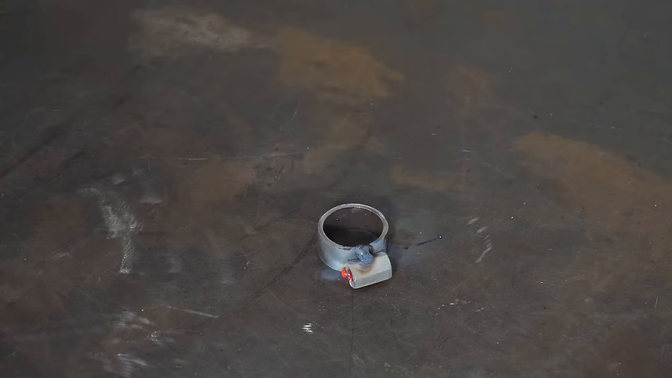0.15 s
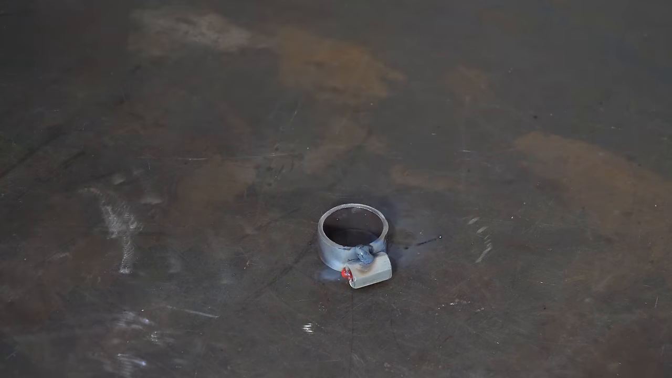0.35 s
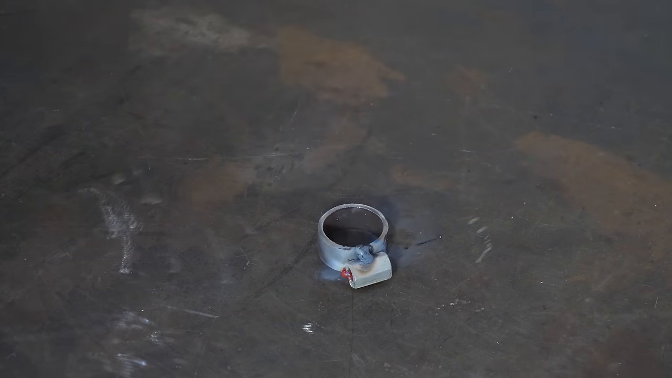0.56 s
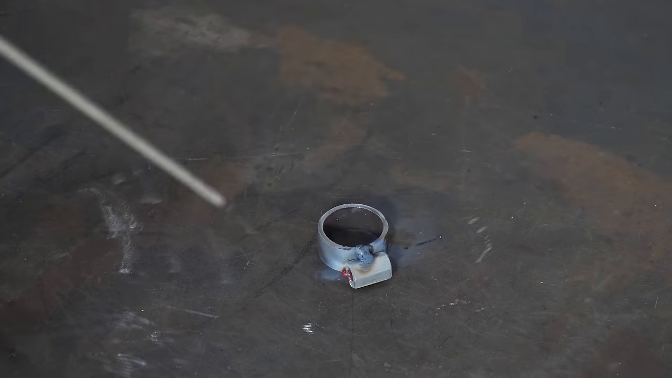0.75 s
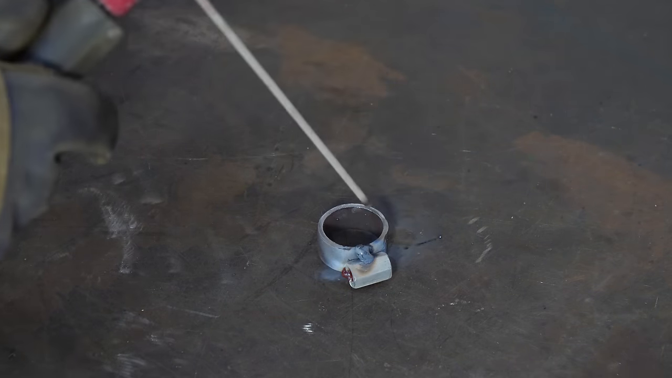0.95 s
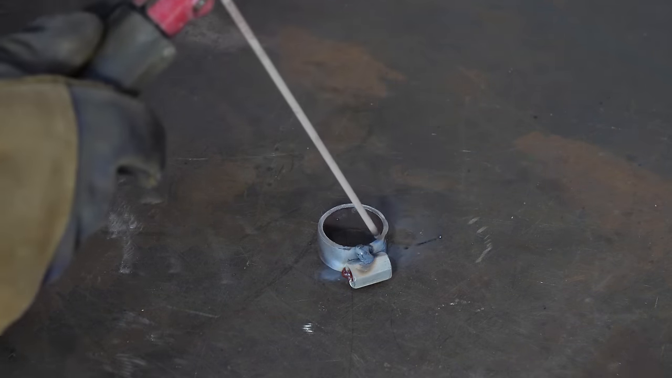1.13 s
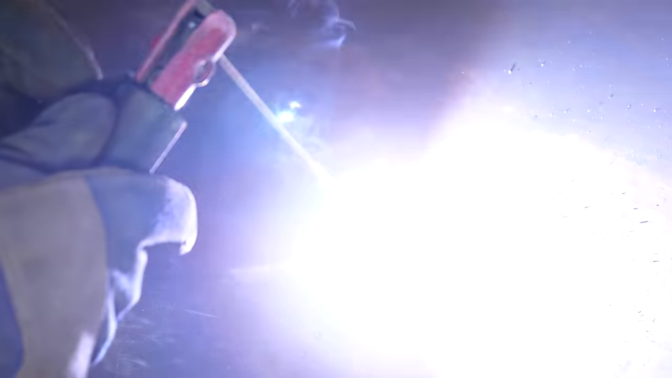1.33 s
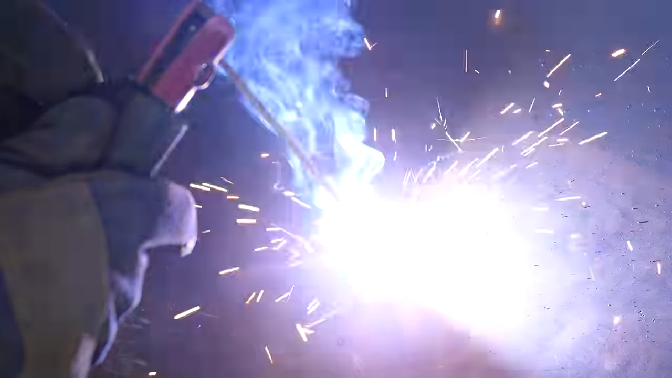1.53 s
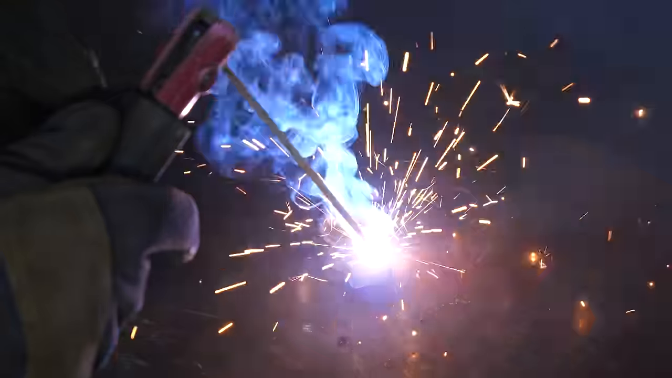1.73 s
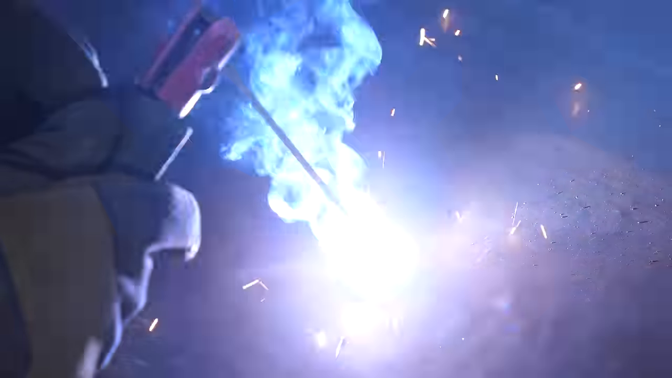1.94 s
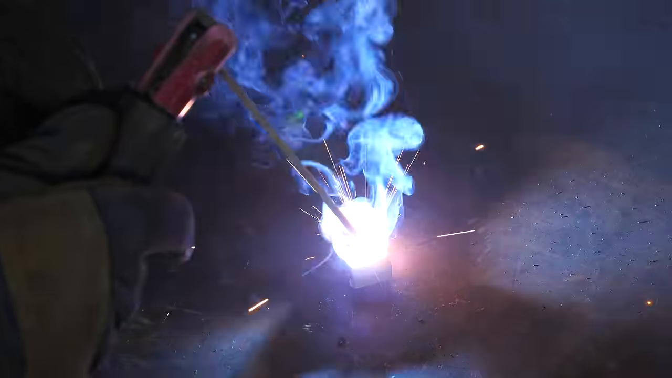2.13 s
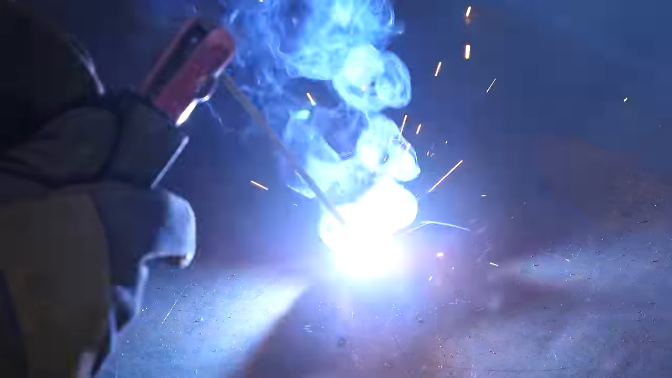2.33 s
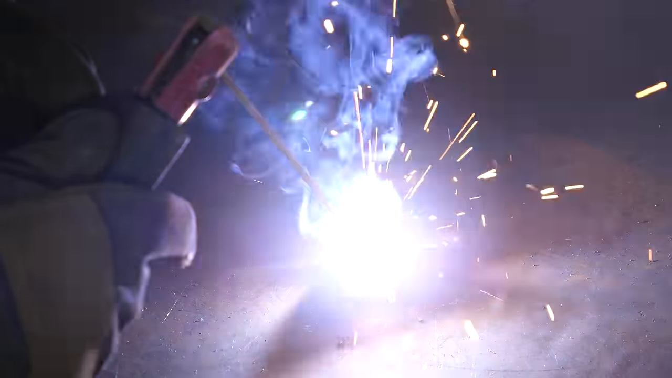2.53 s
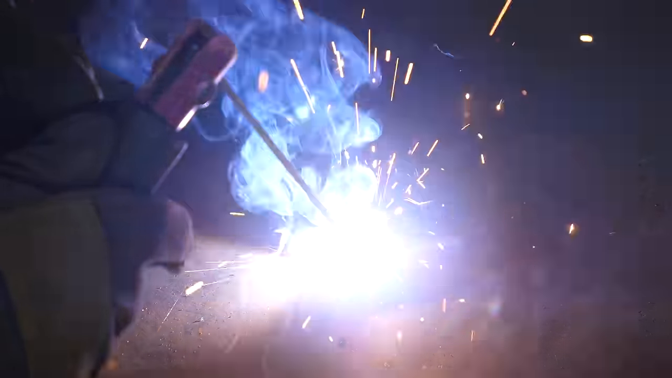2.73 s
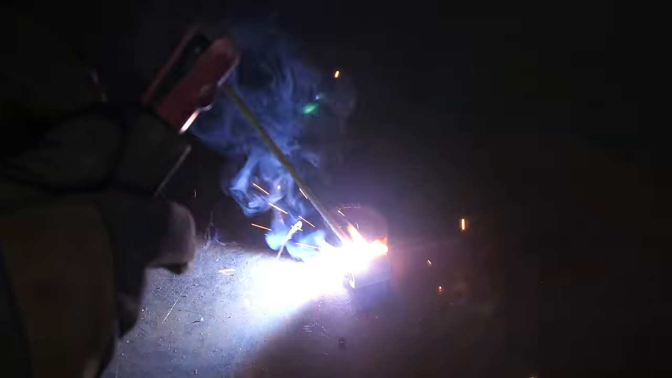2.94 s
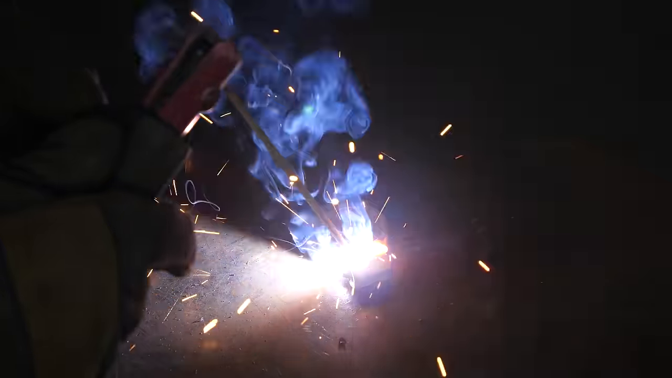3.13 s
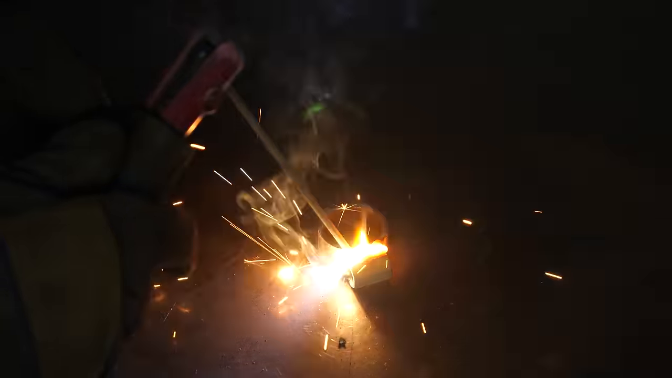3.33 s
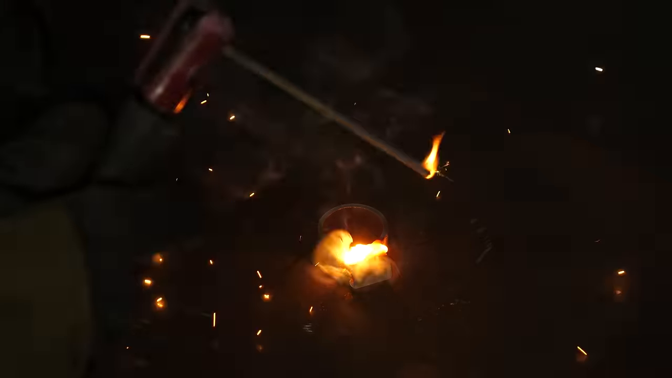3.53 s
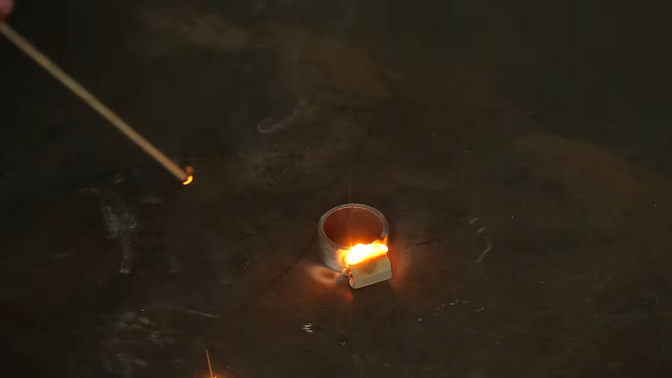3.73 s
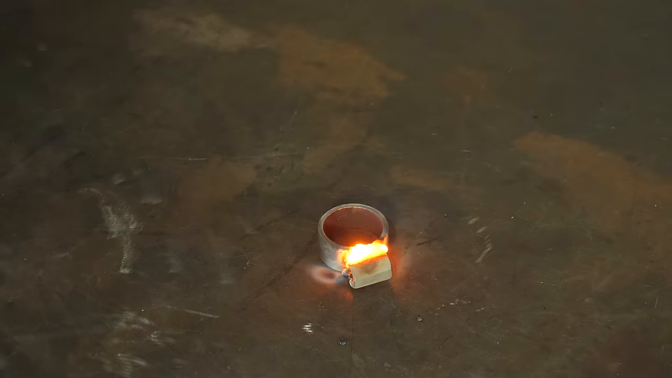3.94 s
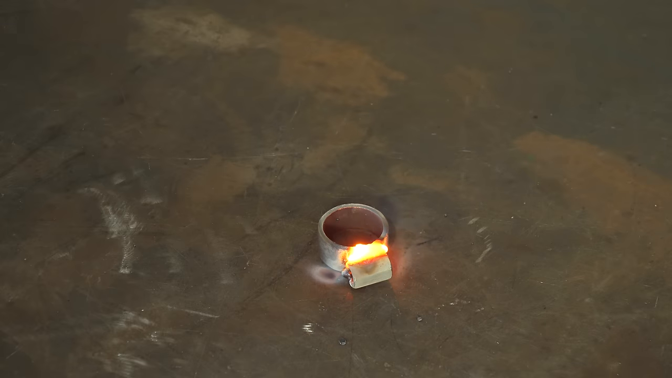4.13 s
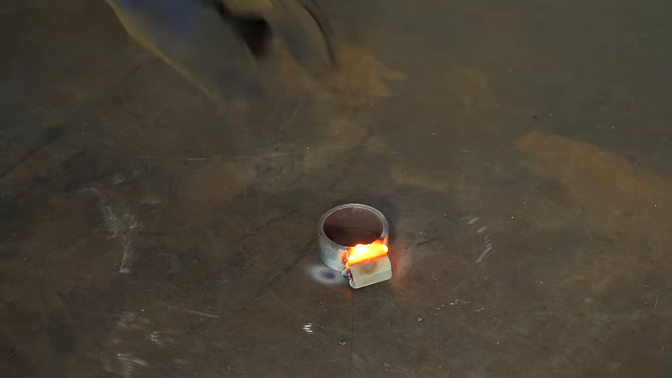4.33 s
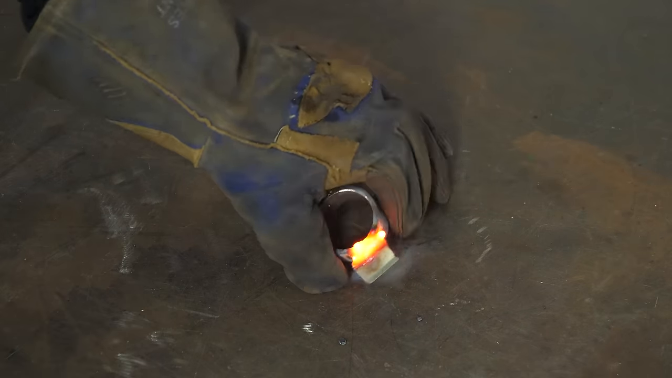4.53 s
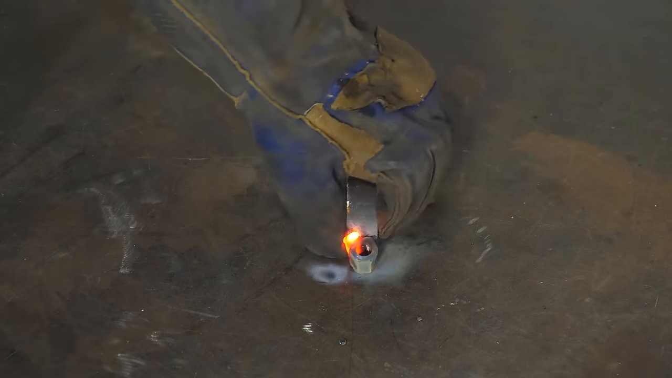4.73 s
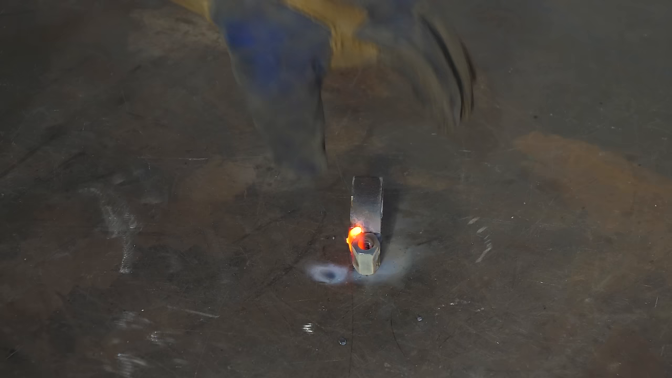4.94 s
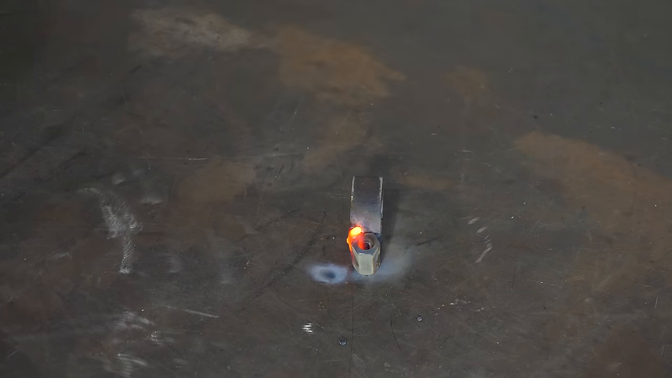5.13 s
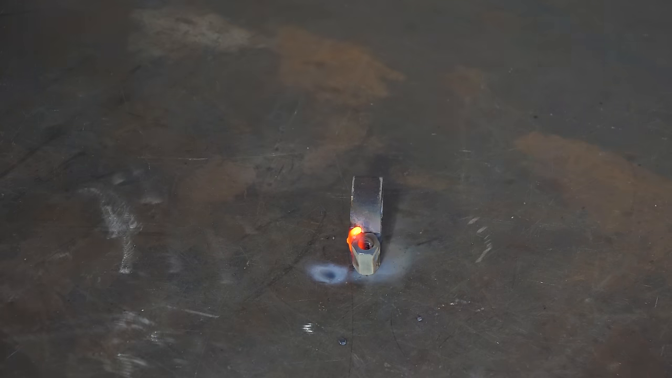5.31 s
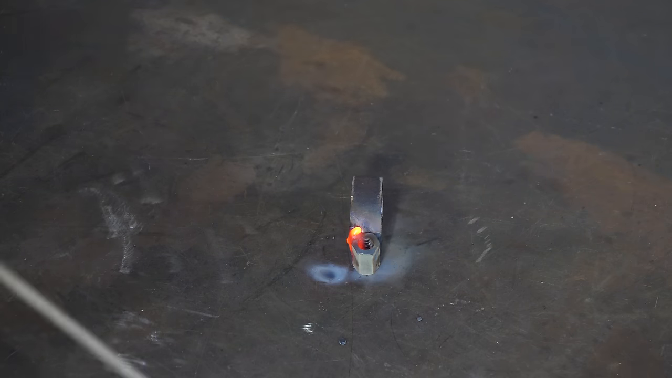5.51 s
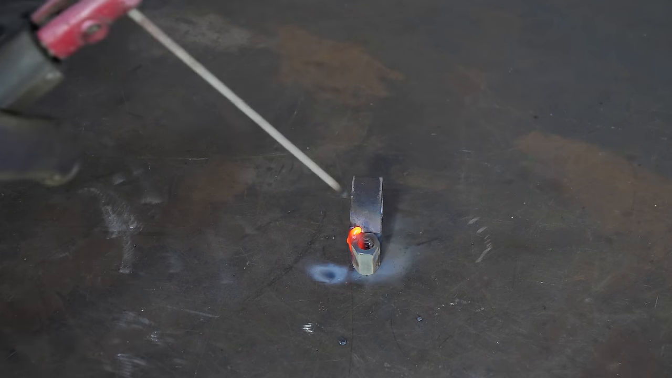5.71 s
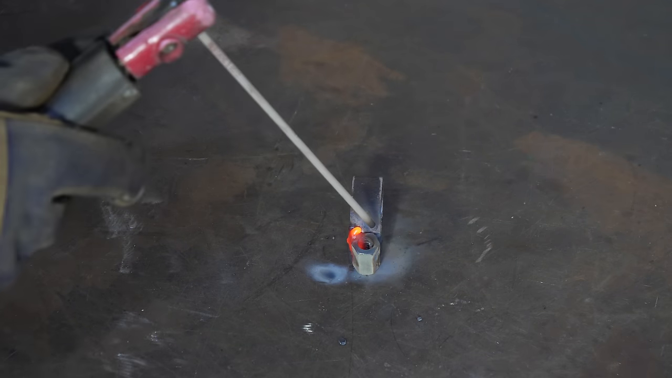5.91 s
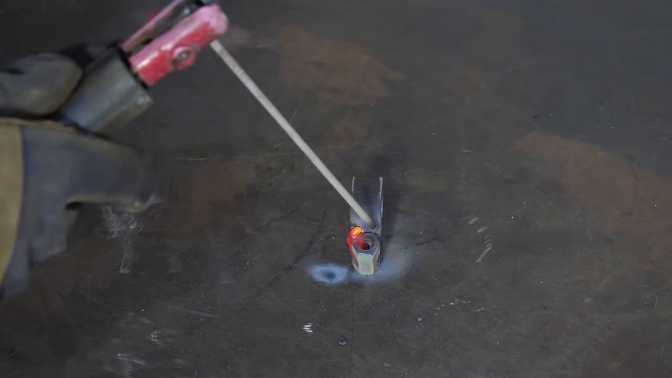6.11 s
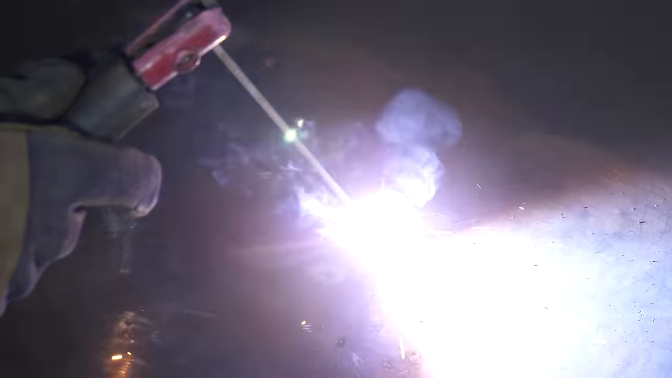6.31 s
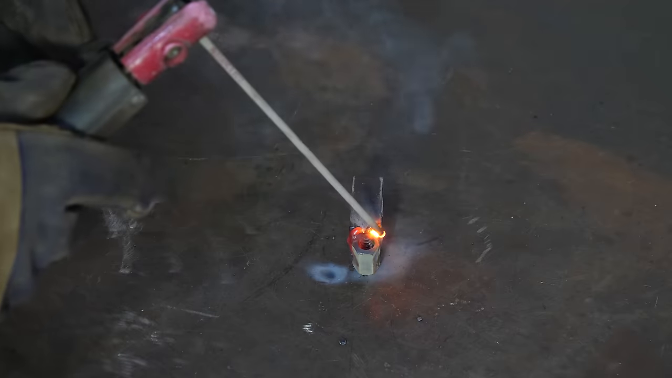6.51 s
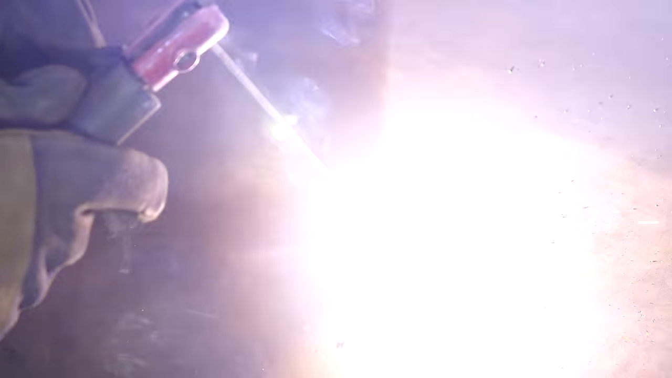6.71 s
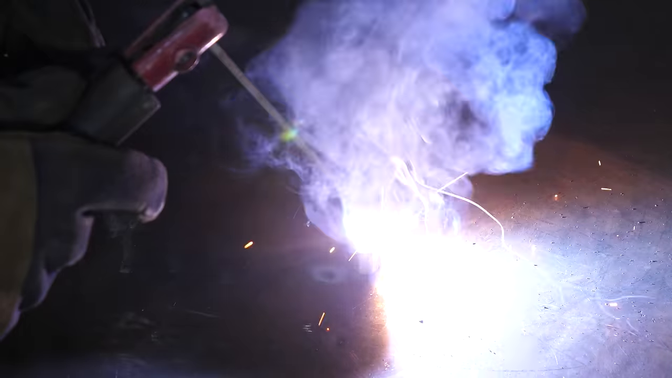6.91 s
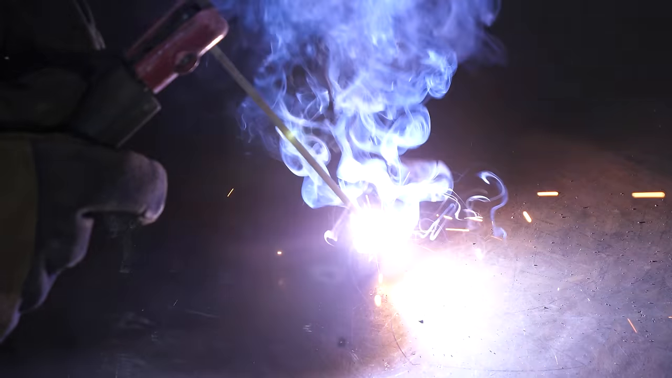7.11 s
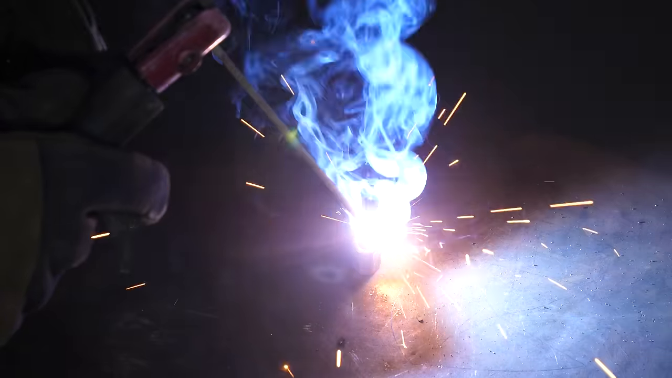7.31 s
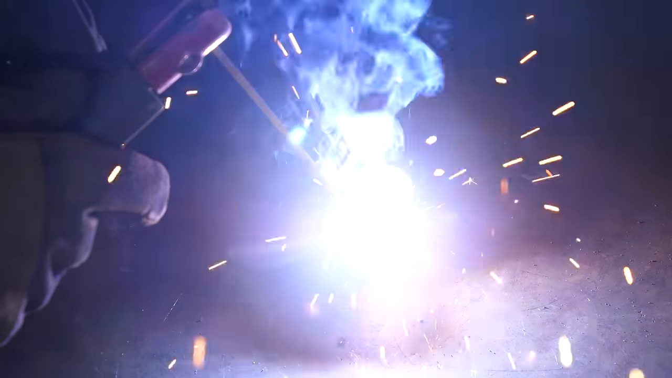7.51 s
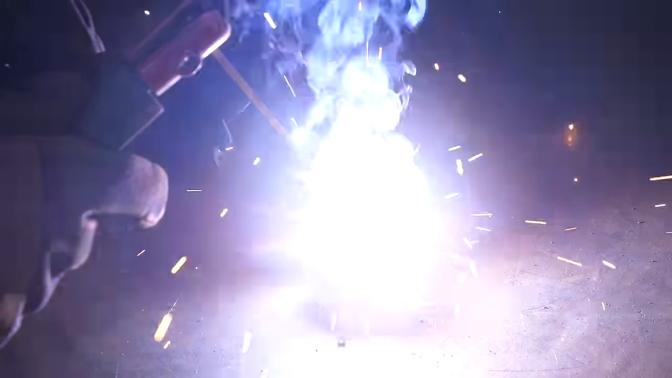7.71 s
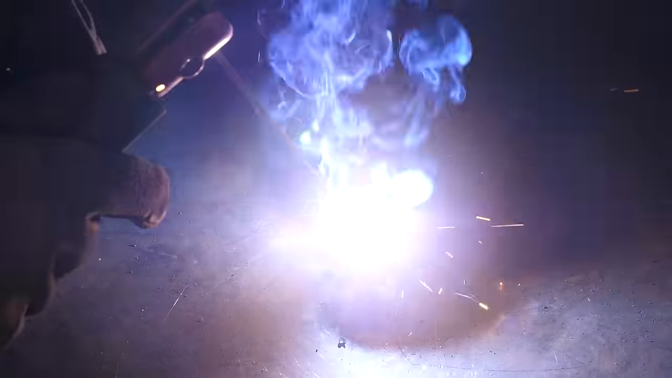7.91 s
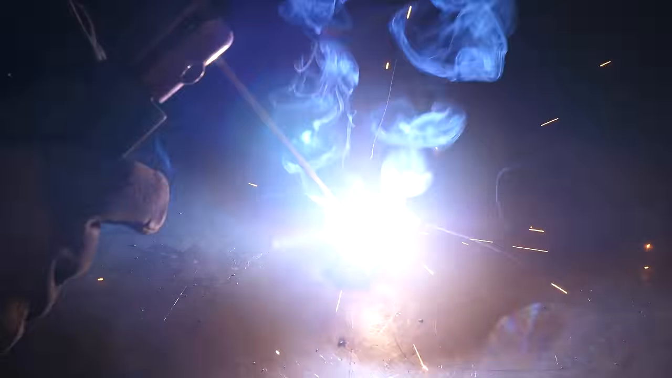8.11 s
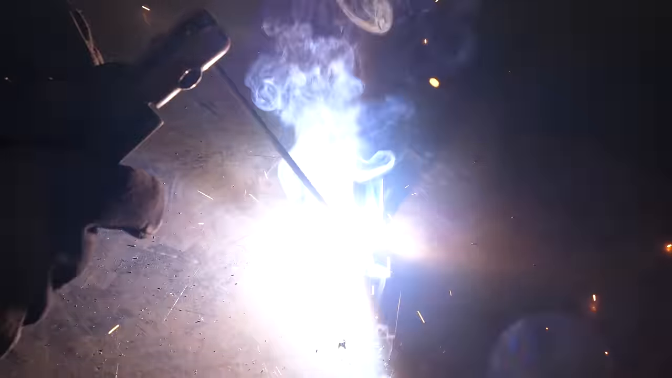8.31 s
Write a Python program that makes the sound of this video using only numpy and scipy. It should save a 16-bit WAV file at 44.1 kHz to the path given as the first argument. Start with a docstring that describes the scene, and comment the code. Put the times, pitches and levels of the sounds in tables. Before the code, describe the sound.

A fan rushes and drones throughout, a midrange airy noise with narrow resonances, in a reverberant hard-walled workshop. A bright metal knock sounds at the very start, a tiny squeaky scrape at 0.35 s and a light tick near 0.95 s. At 1.4 s the arc catches with a strong crack, then burns close and nearly dry until 3.6 s: dense, fluttering crackle over gas hiss, with irregular sharp pops, ending in a sputter. The fan remains with faint electrical hum. Quick knocks with a low plate ring come at 4.1-4.3 s, a clack at 4.55 s, and the loudest bright clank cluster at 4.85 s, echoing. Small squealing scrapes and a tick follow at 5.3-5.7 s. A short arc burst spits at 6.27-6.43 s; after a gap it sputters alight at 6.76 s and crackles, popping, to the end at about 8.4 s. Faint high whistles sink beneath.

```python
"""Stick welding in a workshop

Two runs of the arc and a brief touch between them, on a steel table close to one microphone.
The arc is a crackle of tiny discharges over gas hiss, popping as drops of metal burst; the steel mirrors it.
A fan drones as noise through narrow resonances, under a hum that comes and goes and faint sinking whistles.
Knocks are short noise rings over plate modes, scrapes dense clicks; both echo from hard walls."""
import sys
import numpy as np
from scipy import signal
from scipy.fft import rfft, irfft
from scipy.io import wavfile

SR = 44100
rng = np.random.default_rng(int(sys.argv[2]) if len(sys.argv) > 2 else 0)


def wav_out(sig):
    """Save sig, one row per channel (or a flat mono array), as 16-bit PCM at SR to the path in sys.argv[1]."""
    wavfile.write(sys.argv[1], SR, np.round(np.clip(np.atleast_2d(sig).T, -1, 1) * 32767).astype(np.int16))


N = 368675
T = np.arange(N) / SR  # seconds
HZ = np.fft.rfftfreq(2 * N, 1 / SR)

# Tone of the rushing air. Each row: frequency in Hz, relative level in dB.
AIR_TONE = [(30, -49), (120, -42.5), (280, -26.5), (450, -14.5), (700, -10), (800, 0.5), (1150, -1.5),
            (1620, -4), (1850, -16.5), (2250, -13.5), (3100, -17), (4100, -14), (6500, -21), (9300, -21),
            (12800, -17.5), (15500, -28.5)]
# Resonances of the fan housing. Each row: frequency in Hz, width in Hz, level over the air in dB.
HOUSING_PEAKS = [(160, 12.4, 11), (225, 9.2, 7), (400, 3.2, 1), (874, 32, 9), (907, 12, 0.5),
                 (953, 21, 5.5), (1063.6, 24, 11), (1136, 7.5, 9.5), (1348, 15, 7), (1467, 16.2, 14),
                 (1639, 19, 4.5), (2186, 96, 9), (2370, 14, 10), (2917, 23, 12), (3410, 100, 1.5),
                 (3910, 18, 7), (6230, 51, 4), (7280, 200, 3)]
FAN_DB = -30.5
# Brief dips of fan and sizzle. Each row: start in seconds, end in seconds, change aimed at in dB.
LEVEL_DIPS = [(1.325, 2.14, -3), (2.366, 2.66, -2), (2.938, 3.623, -3), (7.204, 7.652, -3.5),
              (7.842, 8.13, -3.5)]
DIP_RAMP_S, DIP_SIZZLE_SHARE = 0.18, 0.24  # the sizzle takes only a share of each dip

# Metal knocked about in the shop. Each row: time in seconds, level in dB, ring t60 in seconds,
# level sent to the room over the blow in dB, level of the low plate modes over the blow in dB.
METAL_KNOCKS = [(0.001, -3.5, 0.05, 5.5, -32), (.945, -8.5, 0.021, -5, -30), (4.122, -1.5, 0.04, -6, 3),
                (4.134, -4.5, .03, -8, -7), (4.155, -6.5, 0.021, -17, -17), (4.279, -15, 0.035, -19, -3),
                (4.549, 2, 0.13, -2, -37), (4.846, 4, 0.046, -2, -30), (4.8654, 13.5, 0.045, -4, -24),
                (4.88, 6.5, 0.061, -9, -33), (5.526, -7, .015, 6.5, -31)]
# Tone of a knock. Each row: frequency in Hz, relative level in dB.
KNOCK_TONE = [(100, -38), (280, -28), (520, -14), (750, -15), (1250, -3.5), (2300, 0.5), (3600, 0),
              (5000, 1), (6000, -1), (7800, -2), (9000, -5), (10500, -7), (12000, -7.5), (15500, -20)]
# Modes of a steel plate. Each row: frequency in Hz, relative level in dB, t60 in seconds.
PLATE_MODES = [(330, -27, .25), (348, 5, 0.73), (437, 4, 0.77), (577, 11.5, 0.38), (640, 3, 0.81)]

# Squeak of the first scrape. Each row: time in seconds, slip rate in Hz, level in dB.
SQUEAK_PATH = [(.335, 1820, -32), (0.349, 1854, -30), (0.357, 1498, -26), (.365, 1310, -27),
               (0.373, 1360, -23), (.38, 1320, -50)]
# Scrape strokes. Each row: start in seconds, end in seconds, level at the start in dB,
# level at the end in dB, squeal over the rasp in dB.
SCRAPE_STROKES = [(0.343, 0.373, -27.5, -26, -27), (0.371, 0.396, -34, -22.5, -27),
                  (5.338, 5.423, -37, -31, 0.5), (5.555, 5.572, -32.5, -29, 2),
                  (5.578, 5.598, -26, -34, -4), (5.663, 5.703, -43, -35, 5)]
# Tone of a scrape. Each row: frequency in Hz, relative level in dB.
SCRAPE_TONE = [(60, -49), (300, -20), (1200, 9), (2500, 2.5), (4500, -0.5), (7000, 2.5), (9500, 2.5),
               (12500, 3.5), (15500, -8)]

# Faint whistles that sink in pitch. Each row: start in seconds, end in seconds, start pitch in Hz,
# end pitch in Hz, nominal width in Hz, level in dB.
SINKING_WHISTLES = [(0.417, 1.05, 402, 393, 14, -55.5), (1.42, 1.898, 385, 372, 23, -57),
                    (5.13, 5.52, 10840, 9450, 750, -43.5), (6.29, 6.68, 10700, 9350, 920, -42.5),
                    (7.3, 7.71, 10600, 9300, 600, -45), (7.83, 8.168, 10000, 9500, 650, -52),
                    (8.2, 8.343, 7900, 7800, 20, -41)]

# Swells of electrical hum. Each row: start in seconds, end in seconds, relative level in dB.
HUM_SWELLS = [(0.754, 1.432, -67.5), (3.992, 5.198, -65)]
# Lines of the hum. Each row: frequency in Hz, relative level in dB.
HUM_PARTIALS = [(119, -4), (355, 9), (473, 10)]

# The arc burns. Each row: start in seconds, end in seconds, base sizzle level in dB,
# share reflected by the steel from 0 to 1, relative resonance of the steel ring in dB.
ARC_BURNS = [(1.389, 3.592, -35.5, 0.63, -18), (6.271, 6.43, -38, 0.34, 2), (6.759, 8.4, -36.5, 0.43, -2)]
# Tone of one discharge. Each row: frequency in Hz, relative level in dB.
SPARK_TONE = [(60, -39.5), (250, -24), (600, -4), (1200, -4), (1900, -1.5), (2500, 1.5), (3600, -2),
              (4700, 0.5), (6000, 4.5), (7900, 0.5), (9500, 3), (11300, 4.5), (13400, -3.5), (15800, 1.5)]
# Resonances around the workpiece. Each row: frequency in Hz, width in Hz, level over the spark in dB.
WORKPIECE_PEAKS = [(2690, 210, 3), (3600, 190, 7.5), (4710, 320, 6), (13040, 560, 10.5)]
# The loudest drops bursting. Each row: time in seconds, relative crack in dB, relative low thump in dB.
LOUD_POPS = [(1.382, 10.5, -34), (1.4128, 1, -53), (1.4515, -3, -73), (1.459, -3, -62), (1.62, -4.5, -50),
             (1.7893, -3, -47.5), (2.0733, -7, -72), (2.2043, -3, -68), (2.2277, -2.5, -53),
             (2.7571, -1.5, -65), (2.914, -3, -66), (2.9483, -6, -51), (3.3977, -1.5, -66), (6.274, 3, -61),
             (6.424, -8, -64), (6.7605, 0.5, -65), (6.8259, 5, -36.5), (6.899, 1, -65), (6.931, -2, -66),
             (7.1622, -5, -53), (7.4721, -6, -53), (7.552, -6, -68), (7.641, -2, -61), (7.677, -5, -64),
             (7.9256, -1.5, -58), (8.0332, -2.5, -51), (8.202, -7, -63)]
# The arc sputters as it catches or breaks. Each row: start in seconds, end in seconds, level in dB.
ARC_SPUTTERS = [(1.458, 1.464, -31), (3.57, 3.583, -26), (6.419, 6.429, -25), (6.759, 6.822, -27)]
# The sizzle swells or sags for a moment. Each row: start in seconds, end in seconds, change aimed at in dB.
SIZZLE_SWELLS = [(2.147, 2.4, 3), (2.452, 2.648, -6), (2.8, 3.06, 3.5), (3.33, 3.66, 0.5)]
# Every burn surges as it catches, then rises slowly as the metal heats.
SURGE_DB, SURGE_S, HEAT_DB_PER_S = 4.5, 0.15, 1.8
# Smaller drops: nominal rate, then centre and spread of the relative crack and thump.
DROPS_PER_S, DROP_DB, DROP_SPREAD_DB = 19, -6.5, 0.8
DROP_THUMP_DB, DROP_THUMP_SPREAD_DB = -67.5, 7
BULK_GROWTH = 1.1  # dB that the body of a pop gains for each dB of its crack
# The reflection from the steel comes later as the tip moves along the seam.
LAG_MS, LAG_MS_PER_S, LAG_SWAY_MS = .878, .014, .008
# The steel ring resounds more once it stands on its edge.
HOLLOW_HZ, HOLLOW_WIDTH_HZ = 3000, 1600
TOP_HZ = 15900


def amp(db):
    """Decibels to gain."""
    return 10 ** (np.asarray(db) / 20)


def unit(x):
    """Scale to an rms of 1."""
    return x / np.sqrt(np.mean(x ** 2))


def shape(points):
    """Gain at every frequency, drawn through (Hz, dB) points."""
    hz, db = np.transpose(points)
    return amp(np.interp(np.log(HZ + 1), np.log(hz), db))


def resonance(hz, width_hz):
    """Gain of one resonance, 1 at its centre."""
    return 1 / np.sqrt(1 + (2 * (HZ - hz) / width_hz) ** 2)


def peaks(rows):
    """Gain of (Hz, width, dB) resonances standing on a flat response."""
    power = sum((amp(db) * resonance(hz, width)) ** 2 for hz, width, db in rows)
    return np.sqrt(1 + power)


def colour(x, gain):
    """Causal minimum-phase filter shaped like the gain; white sound keeps its energy."""
    cepstrum = irfft(np.log(unit(gain) + 1e-9))
    # folding the cepstrum forward makes the filter respond only after each sound
    cepstrum[1:N] *= 2
    cepstrum[N + 1:] = 0
    response = np.exp(rfft(cepstrum))
    return irfft(rfft(x, 2 * N) * response)[:N]


def filtered(x, hz, kind, order=1):
    """Plain low-, high- or band-pass."""
    return signal.sosfilt(signal.butter(order, hz, kind, fs=SR, output="sos"), x)


def walk(rate):
    """Smooth chance with an rms of 1 that takes a new target rate times a second."""
    knots = rng.standard_normal(N // 20)
    return unit(np.interp(T * rate, np.arange(len(knots)), knots))


def gate(start, end, edge):
    """Open from start to end, with ramps of edge seconds inside."""
    rise = np.clip((T - start) / edge, 0, 1)
    fall = np.clip((end - T) / edge, 0, 1)
    return rise * fall


def fade(t60, length=1):
    """Exponential decay over length seconds, down 60 dB at t60."""
    return amp(-60 * T[:int(length * SR)] / t60)


def ring(t60):
    """A dense cloud of dying vibrations with an energy of 1."""
    cloud = rng.standard_normal(SR) * fade(t60)
    return cloud / np.linalg.norm(cloud)


def add(track, s, sound):
    """Mix a sound in at time s."""
    start = max(int(round(s * SR)), 0)
    track[start:start + len(sound)] += sound[:N - start]


def crackle(rate, spread_db):
    """Random clicks of either sign, about rate a second; a positive spread makes a few large ones."""
    size = amp(spread_db * np.minimum(rng.exponential(size=N), 4))
    hits = rng.random(N) < rate / SR
    return unit(hits * size * rng.choice([-1, 1], N))


def dips():
    """Brief dips of the level, in dB."""
    return sum(db * gate(start, end, DIP_RAMP_S) for start, end, db in LEVEL_DIPS)


def fan(waver_db=0.77):
    """Rushing air that rings the narrow resonances of its housing."""
    air = colour(rng.standard_normal(N), shape(AIR_TONE) * peaks(HOUSING_PEAKS))
    return air * amp(FAN_DB + dips() + waver_db * walk(14))


def knocks(rattle_db=1, rattle_t60=0.34):
    """Bright metal blows over ringing plate modes; returns the direct sound and what reaches the walls."""
    modes = sum(amp(db) * np.sin(2 * np.pi * hz * T[:SR]) * fade(t60) for hz, db, t60 in PLATE_MODES)
    modes = filtered(modes, 240, "highpass", order=3)  # a plate radiates little bass
    direct, spread, low = np.zeros((3, N))
    for s, db, t60, room_db, plate_db in METAL_KNOCKS:
        blow = amp(db) * ring(t60)
        rattle = filtered(ring(rattle_t60), (310, 680), "bandpass", order=4)
        plate = unit(modes) + amp(rattle_db) * unit(rattle)
        add(direct, s, blow)
        add(spread, s, amp([db + room_db]))  # a single click feeds the walls
        add(low, s, plate / np.linalg.norm(plate) * amp(db + plate_db))
    return colour(direct, shape(KNOCK_TONE)) + low, colour(spread, shape(KNOCK_TONE))


def workshop(x, low_t60=0.64, mid_t60=0.63, high_t60=0.75, gap_s=.008):
    """Diffuse echo of hard walls, with its own decay in the bass, middle and treble."""
    tail = np.zeros(N)
    bands_hz = [((100, 3000), low_t60), ((3000, 8000), mid_t60), ((8000, 18000), high_t60)]
    for band, t60 in bands_hz:
        noise = filtered(rng.standard_normal(SR), band, "bandpass", order=3)
        add(tail, gap_s, noise * fade(t60))
    return signal.fftconvolve(x, tail[:SR] / np.linalg.norm(tail))[:N]


def squeak(jitter=0.058, count=3):
    """Metal sticks and slips in a rough, brief tone of a few harmonics."""
    s, hz, db = np.transpose(SQUEAK_PATH)
    slip_hz = np.interp(T, s, hz) * (1 + jitter * walk(900))
    phase = 2 * np.pi * np.cumsum(slip_hz) / SR
    tone = unit(sum(np.sin(k * phase) for k in range(1, count + 1)))
    return tone * amp(np.interp(T, s, db)) * gate(s[0], s[-1], .003)


def scrapes(squeal_hz=5100, squeal_width_hz=1100, judder_db=2):
    """Metal dragged over metal: dense slips that rasp and ring a squeal, stronger in some strokes."""
    slips = crackle(rate=7000, spread_db=-1.5) * amp(judder_db * walk(200))
    rasp, squeal = np.zeros((2, N))
    for start, end, first_db, last_db, squeal_db in SCRAPE_STROKES:
        level = amp(np.interp(T, [start, end], [first_db, last_db]))
        stroke = slips * gate(start, end, 0.0053) * level
        rasp += stroke
        squeal += stroke * amp(squeal_db)
    squeal_tone = shape(SCRAPE_TONE) * resonance(squeal_hz, squeal_width_hz) ** 0.98
    return colour(rasp, shape(SCRAPE_TONE)) + colour(squeal, squeal_tone)


def whistles():
    """Narrow bands of hiss, high and low, that swell, sink in pitch and fade."""
    out = 0
    for start, end, first_hz, last_hz, width_hz, db in SINKING_WHISTLES:
        pitch = np.interp(T, [start, end], [first_hz, last_hz])
        phase = 2 * np.pi * np.cumsum(pitch) / SR
        band = walk(width_hz) * np.cos(phase) + walk(width_hz) * np.sin(phase)
        out = out + amp(db) * band * gate(start, end, (end - start) / 3)
    return out


def hum():
    """A faint electrical hum of steady sine lines that comes and goes."""
    lines = sum(amp(db) * np.sin(2 * np.pi * hz * T) for hz, db in HUM_PARTIALS) * np.sqrt(2)
    return lines * sum(amp(db) * gate(start, end, (end - start) / 6) for start, end, db in HUM_SWELLS)


def small_drops(count=300):
    """Drops that burst at uneven intervals during the burns, as rows like those of LOUD_POPS."""
    wait, crack, thump = np.clip(rng.standard_normal((count, 3)), -2, 2).T
    times = np.cumsum(np.exp(.5 * wait)) / DROPS_PER_S
    crack_db = DROP_DB + DROP_SPREAD_DB * crack
    thump_db = DROP_THUMP_DB + DROP_THUMP_SPREAD_DB * thump
    rows = np.column_stack([times, crack_db, thump_db])
    return [row for row in rows if any(start < row[0] < min(end, T[-1]) for start, end, *_ in ARC_BURNS)]


def pops(crack_db=0, spit_db=-8, spit_t60=0.014, thump_db=42, bulk_db=3,
         bulk_low_hz=700, bulk_high_hz=2300, count=400):
    """Each bursting drop gives a double crack, a short spit of spatter and a puff of hot gas."""
    cracks, bulk, puffs = np.zeros((3, N))
    lags = rng.integers(7, 30, count)  # samples between the two cracks
    decay = fade(spit_t60)[:SR // 20]
    spits = rng.standard_normal((count, len(decay))) * decay / np.linalg.norm(decay)
    for (s, db, low_db), lag, spit in zip(list(LOUD_POPS) + small_drops(), lags, spits):
        burst = amp(spit_db) * spit
        burst[[0, lag]] += [.8, .55]
        add(cracks, s, burst * amp(db + crack_db))
        add(bulk, s, amp([BULK_GROWTH * db + bulk_db]))  # a bigger burst sounds fuller
        add(puffs, s, amp([low_db + thump_db]))
    body = filtered(bulk, (bulk_low_hz, bulk_high_hz), "bandpass")
    return cracks + body, filtered(puffs, 410, "lowpass")


def sizzle_level(swell_ramp_s=0.13):
    """Level of the sizzle in dB, from the time since the arc last caught."""
    level = np.zeros(N)
    for start, _, db, *_ in ARC_BURNS:
        age = T - start
        burn = db + SURGE_DB * np.exp(-np.abs(age) / SURGE_S) + HEAT_DB_PER_S * age
        level = np.where(age >= 0, burn, level)
    swells = sum(db * gate(start, end, swell_ramp_s) for start, end, db in SIZZLE_SWELLS)
    return level + DIP_SIZZLE_SHARE * dips() + swells


def mirror(x, lag_ms, share):
    """Add the reflection from the steel, which returns mostly treble; its lag may move."""
    treble = filtered(x, 2800, "highpass")
    return x + min(share, 1) * np.interp(T - lag_ms / 1000, T, treble)


def arc(hiss_db=-2, flutter_db=1.87, sputter_db=0.66, coarse_hz=5000, flare_db=-7):
    """Tiny discharges over a hiss of gas, with pops where a drop shorts the gap and bursts."""
    unrest = amp(flutter_db * walk(260) + sputter_db * walk(45))  # the arc length never holds still
    sizzle = unit(crackle(rate=2600, spread_db=4.5) + amp(hiss_db) * rng.standard_normal(N))
    sizzle *= unrest * amp(sizzle_level())
    # an unstable arc makes larger, duller discharges, and its gas flares
    unstable = sum(amp(db) * gate(start, end, 0.0036) for start, end, db in ARC_SPUTTERS)
    sizzle += unstable * unit(filtered(crackle(rate=5500, spread_db=8.0), coarse_hz, "lowpass"))
    gas = unit(filtered(rng.standard_normal(N), (420, 1900), "bandpass", order=2))
    flare = unstable * amp(flare_db) * gas
    cracks, puffs = pops()
    # the tip moves, so the comb of the reflection drifts
    out, sway = 0, LAG_SWAY_MS * walk(4.8)
    hollow_band = (HOLLOW_HZ - HOLLOW_WIDTH_HZ / 2, HOLLOW_HZ + HOLLOW_WIDTH_HZ / 2)
    for start, end, _, share, hollow_db in ARC_BURNS:
        burn = sizzle * gate(start, end, .003) + cracks * gate(start - .01, end, .001)
        burn = burn + amp(hollow_db) / 2 * filtered(burn, hollow_band, "bandpass")
        lag_ms = LAG_MS + LAG_MS_PER_S * (T - start) + sway
        out = out + mirror(burn, lag_ms, share)
    return colour(out, shape(SPARK_TONE) * peaks(WORKPIECE_PEAKS)) + puffs + flare


def scene(arc_room_db=-14, scrape_room_db=-6):
    """The arc is close and nearly dry; the knocks and scrapes fill the room. Both channels are alike."""
    weld = arc()
    rasp = scrapes() + squeak()
    blows, spread = knocks()
    echo = workshop(amp(arc_room_db) * weld + amp(scrape_room_db) * rasp + spread)
    mono = weld + rasp + blows + echo + fan() + hum() + whistles()
    return np.array([mono, mono])


def record(dry):
    """The recorder clips the sharpest cracks, then a steep low-pass cuts the top."""
    clipped = np.clip(dry, -1.1, 1.1)
    return signal.sosfilt(signal.ellip(10, .2, 70, TOP_HZ, fs=SR, output="sos"), clipped)


dry = scene()
out = record(dry)
wav_out(out)
```